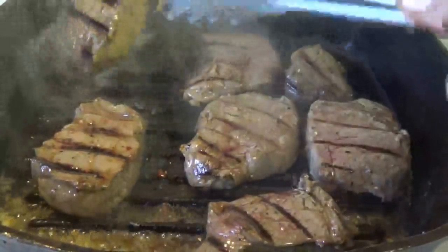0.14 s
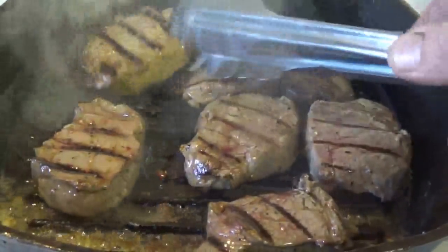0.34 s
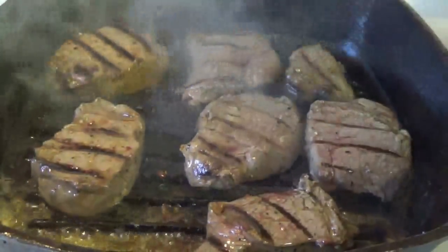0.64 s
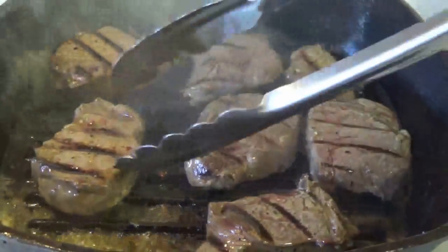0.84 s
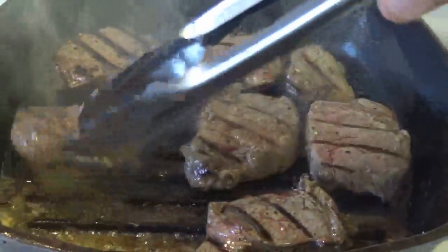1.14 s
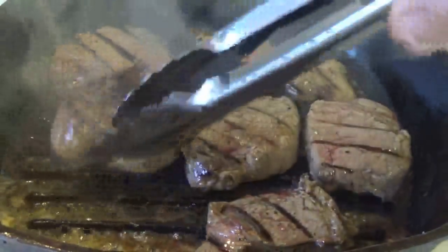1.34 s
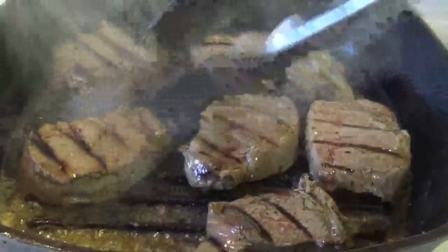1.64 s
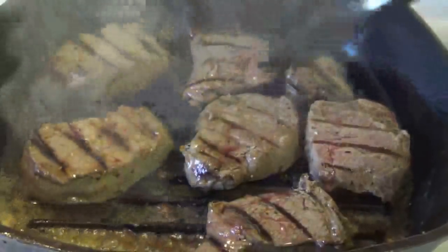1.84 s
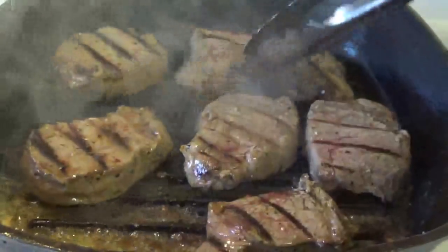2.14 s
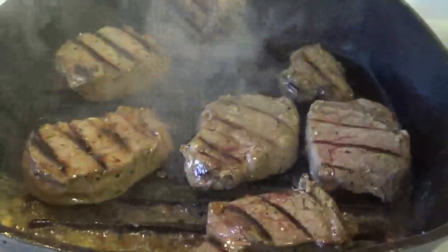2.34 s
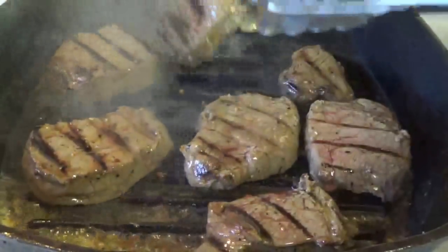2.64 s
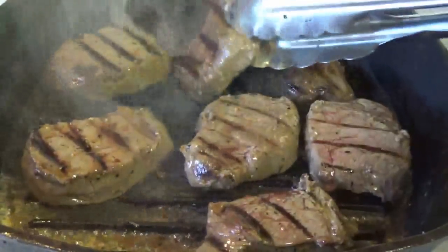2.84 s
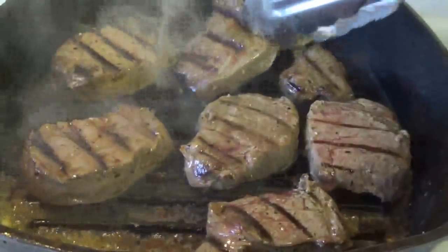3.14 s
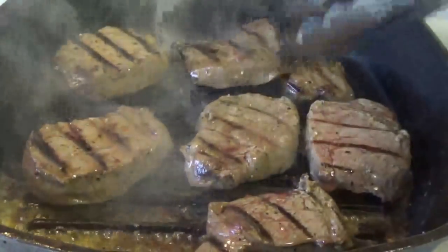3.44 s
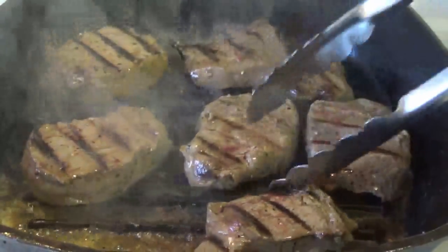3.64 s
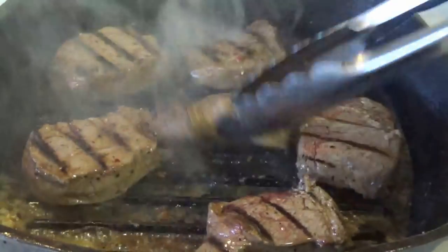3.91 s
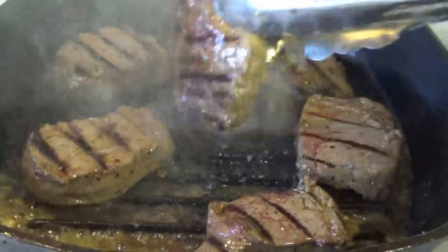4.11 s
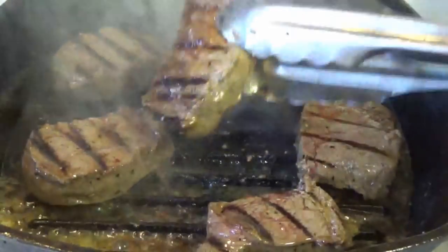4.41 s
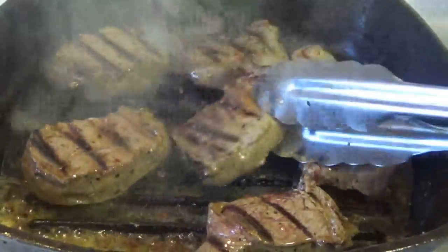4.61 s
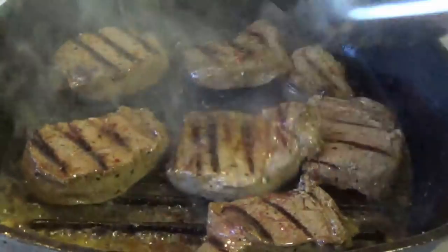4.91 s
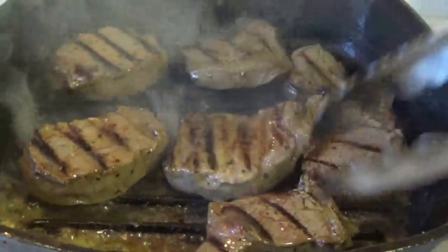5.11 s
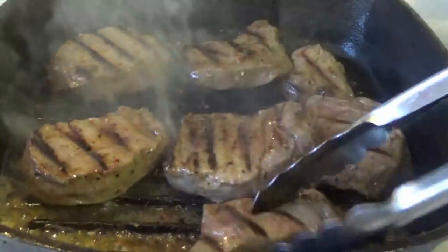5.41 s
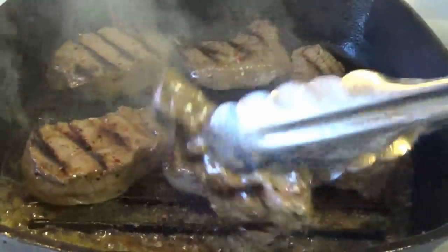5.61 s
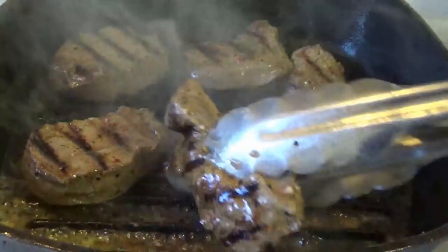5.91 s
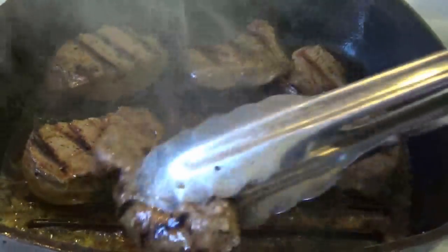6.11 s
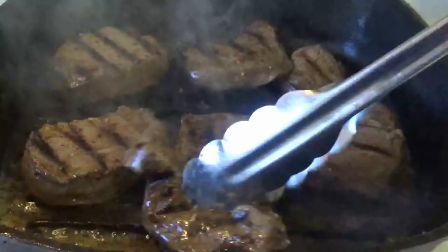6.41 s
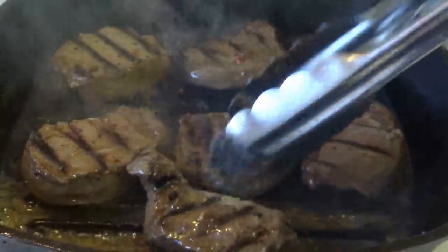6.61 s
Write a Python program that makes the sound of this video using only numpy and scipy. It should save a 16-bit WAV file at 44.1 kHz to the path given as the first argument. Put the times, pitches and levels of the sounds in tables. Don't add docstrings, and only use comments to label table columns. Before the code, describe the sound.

A loud, crisp frying hiss runs from start to finish with no pause, wavering slightly as meat pieces are lifted and turned. Crackles and snappy fat pops come irregularly, first in a quick cluster, then scattered. Wet steam squeals under newly laid meat early and late, and a few rounder plops sit below the pops. Close microphone over the stove, moderately wide, dry, with dulled extreme treble.

```python
import sys
import numpy as np
from scipy import signal
from scipy.fft import rfft, irfft, next_fast_len
from scipy.io import wavfile
from scipy.ndimage import uniform_filter1d

SR = 44100
rng = np.random.default_rng(int(sys.argv[2]) if len(sys.argv) > 2 else 0)


def generate_wav(sig):
    pcm = np.round(np.clip(np.atleast_2d(sig).T, -1, 1) * 32767).astype(np.int16)
    wavfile.write(sys.argv[1], SR, pcm)


def ratio_of_db(decibels):
    return 10 ** (np.asarray(decibels, float) / 20)


N = 297675
SLOW_S = np.arange(0, N / SR + .01, 1 / 400)

# time in seconds, strength in dB, coarseness (large bubbles against small) in dB.
BOIL = [(0, -17.5, -9.5), (.3, -20, -7.5), (.7, -19, -8), (1.1, -17.5, -7.5), (1.45, -19, -9.5),
        (1.8, -18.5, -10.5), (2.2, -19, -10.5), (2.55, -17.5, -10.5), (2.9, -18, -9.5), (3.3, -17.5, -10),
        (3.7, -16.5, -10.5), (4.2, -17.5, -9), (4.55, -17.8, -11), (4.87, -16.5, -9), (5.2, -17.5, -10),
        (5.7, -17.5, -8.5), (6.2, -18.5, -8.5), (6.75, -18.5, -7.5)]
SIZE_HZ = [5300, 8800, 2800, 1000]
FOLLOW_STRENGTH = [1, 0.66, 0.6, 0.32]
FOLLOW_COARSE = [-0.12, 0.13, 1.22, 0.2]
# frequency in Hz, level in dB per Hz.
FRY_COLOUR = [(15, -66), (25, -35), (77, -42.5), (353, -34.5), (840, -23.5), (1200, -21), (1430, -13.5),
              (1630, -17), (1760, -13), (2330, -9.5), (2640, -5.5), (4510, 0.5), (9680, 0.16), (11000, -3),
              (14300, -68), (22000, -120)]
# frequency in Hz, side against mid in dB.
SIDE_COLOUR = [(30, -21), (60, -12), (130, -12), (300, -17), (620, -15), (1120, -12), (2000, -9.5),
               (3600, -12), (6400, -14.5), (11600, -15.5)]
# time in seconds, length in seconds, bubble pitch in Hz,
# change in dB.
FLARES = [(.375, 0.22, 890, 6.5), (1.515, 0.2, 1500, 6), (3.37, 0.069, 1300, 4), (3.4, .2, 860, 0),
          (5, .15, 1130, 6.5), (5.75, 0.1, 1200, 2), (6.47, 0.16, 1300, 5), (2.1, 0.14, 1500, -1),
          (1.62, 0.34, 11000, 1.5), (3.5, 0.14, 11000, 3.5), (4.18, 0.18, 11000, 3), (0.68, 0.14, 10000, 1),
          (0.88, 0.17, 7400, -2), (3.87, 0.15, 12000, -2), (6.3, 0.27, 8800, -1), (2.46, 0.17, 5300, 1),
          (2.96, .7, 2300, -1), (4.7, .3, 7000, 0), (.75, 0.28, 6800, 1.3), (4.1, 0.32, 4000, 0.5),
          (1.15, 0.88, 3600, -2), (4.25, 0.2, 4500, 1), (3.5, .3, 6800, -1.5), (4.2, .4, 5700, -2),
          (2.4, 0.27, 14000, 1.5), (0.4, 0.43, 13000, 2), (6.25, 0.12, 6100, -1), (4.5, 0.1, 5300, -2.5),
          (2.7, .12, 6600, 0.5)]
# time in seconds, length in seconds, change in dB.
LOW_SWELLS = [(.1, .1, -3), (.73, 0.092, -2), (0.224, .08, 4.5), (0.333, 0.089, -9), (.55, 0.062, 5),
              (1.14, .07, -12), (1.58, 0.077, -2), (2.08, .18, 3.5), (2.4, .25, 1.5), (2.623, .14, 0),
              (2.8, 0.27, -5), (3.25, 0.17, 0.5), (3.697, .06, -6), (3.787, 0.079, -15), (3.873, 0.072, 2.5),
              (4.01, 0.072, 7), (4.096, 0.056, -7), (4.63, 0.12, 2.5), (4.89, 0.035, 3), (5.028, .08, -12),
              (5.323, .15, -6.5), (5.508, 0.1, 5.5), (5.762, 0.07, -8), (5.898, 0.04, -6), (6.285, 0.066, 3),
              (6.426, 0.048, -7)]
# start in seconds, length in seconds, first pitch
# in Hz, last pitch in Hz, level in dB.
JETS = [(1.425, 0.094, 6000, 6500, -22.5), (1.62, 0.17, 4750, 5000, -27), (1.77, 0.67, 5260, 4530, -23),
        (1.6, .6, 4340, 4100, -28), (6.15, .08, 3400, 4200, -24), (6.19, 0.16, 4200, 4600, -24.5),
        (6.39, 0.21, 4640, 5050, -24), (6.155, 0.113, 2850, 3140, -26), (5.5, 0.17, 2650, 2750, -41),
        (4.5, 0.1, 7160, 7200, -30), (5.86, 0.092, 6000, 5880, -26.5), (.3, .45, 6400, 6400, -27),
        (3.05, 0.27, 5000, 5400, -28), (4.3, .4, 4650, 4300, -29), (4.85, .2, 4130, 4200, -27.5)]
# time in seconds, peak in dB, pitch in Hz, ringing in cycles.
SPITS = [(0.501, -5, 2850, 7.3), (0.5363, -10, 3390, 5), (0.5631, -3, 3250, 5.3), (0.626, -9, 3950, 6),
         (0.7332, -8, 3150, 3.2), (0.9537, -11, 3030, 6), (1.174, -11, 3350, 7.7), (2.017, -9, 3680, 6),
         (2.0363, -5, 4100, 5.4), (2.163, -11, 3530, 8.9), (2.3111, -12, 3900, 6), (2.7263, -11, 3710, 6),
         (3.1747, -10, 3360, 5), (3.4974, -9.5, 3190, 6.8), (3.5992, -8, 3700, 6.7),
         (3.7808, -11.5, 3720, 7.7), (3.9923, -14, 3630, 6.8), (4.1744, -12, 3180, 7.2),
         (4.681, -17, 4200, 6), (4.7987, -6, 2880, 5.2), (4.8678, -11, 3100, 6.6), (4.9152, -10, 4130, 6.5),
         (5.199, -10, 3200, 8), (5.3797, -8, 3530, 6.5), (5.4096, -12, 3500, 6), (5.981, -9, 3740, 6),
         (6.1619, -11, 3420, 8.2), (6.3904, -10, 3040, 5.1), (6.638, -15, 3390, 6.6),
         (6.6617, -6, 3180, 6.6)]
# time in seconds, peak in dB, pitch in Hz, ringing in cycles.
PLOPS = [
    (0.719, -25, 2280, 3.7),
    (1.449, -23.5, 1830, 3.9),
    (3.369, -18.5, 2480, 3.2),
    (3.819, -18.5, 2390, 6.5),
    (4.199, -34, 1550, 4.5),
    (5.429, -24.5, 2520, 4.5),
    (6.019, -16.5, 2180, 3.9),
    (6.396, -11, 2580, 3.8),
    (6.484, -17, 2430, 4.5),
]
# delay in seconds, level in dB.
ECHOES = [(0.00344, -22.5), (0.0009, -35), (.0071, -18.5)]


def evened(x):
    return x / np.sqrt(np.mean(x ** 2) + 1e-20)


def read(points, hz):
    f, value = np.transpose(points)
    return np.interp(np.log(hz + 1), np.log(f + 1), value)


def coloured(x, points):
    size = next_fast_len(N)
    gain = ratio_of_db(read(points, np.fft.rfftfreq(size, 1 / SR)))
    return irfft(rfft(x, size) * gain, size)[..., :N]


def drift(per_s):
    hz = np.fft.rfftfreq(len(SLOW_S), SLOW_S[1])
    spectrum = rfft(rng.standard_normal(len(SLOW_S))) / (1 + (hz / per_s) ** 2)
    return evened(irfft(spectrum, len(SLOW_S)))


def bump(at_s, length_s):
    return np.exp(-4 * ((SLOW_S - at_s) / length_s) ** 2)


def bubble(hz, cycles, glide=0.061, snap=10.6):
    u = np.arange(int(3 * cycles / hz * SR) + 8) / SR * hz / cycles
    envelope = (1 - np.exp(-snap * u)) * np.exp(-3.0 * u)
    ring = envelope * np.sin(2 * np.pi * cycles * u * (1 + glide * u))
    return ring / abs(ring).max()


def fry(per_s=420, spread_db=3.0, cycles=3.93, gust_db=0.76, patch_db=1.3, mist_db=-0.5, heave_db=1.4, count=30):
    boil_s, level_db, coarse_db = np.transpose(BOIL)
    share_db = np.outer(FOLLOW_STRENGTH, level_db - level_db.mean())
    share_db = share_db + np.outer(FOLLOW_COARSE, coarse_db - coarse_db.mean())
    order = np.argsort(SIZE_HZ)
    log_sizes = np.log(SIZE_HZ)[order]
    t = np.arange(N) / SR
    gust = gust_db * drift(30.0)
    heave = sum(db * bump(at_s, length_s) for at_s, length_s, db in LOW_SWELLS)
    heave = heave - heave.mean() + heave_db * drift(3.6)
    mist = ratio_of_db(mist_db) * rng.standard_normal((2, N))
    out = np.zeros((2, N))
    for hz in np.geomspace(30, 12000, count):
        blend = np.array([np.interp(np.log(hz), log_sizes, order == k) for k in range(len(SIZE_HZ))])
        strength_db = np.interp(SLOW_S, boil_s, blend @ share_db) + gust + patch_db * drift(10.0)
        strength_db += 1.42 * heave / (1 + (hz / 600) ** 2)
        for at_s, length_s, flare_hz, db in FLARES:
            octaves = np.log2(hz / flare_hz)
            strength_db += db * bump(at_s, length_s) * np.exp(-(octaves / 0.7) ** 2)

        bursts_n = int(per_s * (hz / 5000) ** .6 * N / SR)
        when, chance, place = rng.random((3, 12000))[:, :bursts_n]
        size = ratio_of_db(spread_db * np.minimum(-np.log(chance), 4))
        bursts = np.zeros((2, N))
        bursts[:, (when * N).astype(int)] = size * np.array([place ** 0, np.sqrt(12) * (place - .5)])
        drive = bursts / np.std(bursts[0]) + np.roll(mist, rng.integers(N), axis=1)
        drive = drive * np.interp(t, SLOW_S, ratio_of_db(strength_db))

        shape = bubble(hz, cycles * rng.uniform(1.0, 1.005))
        shape *= np.sqrt(hz) / np.linalg.norm(shape)
        out += signal.oaconvolve(drive, shape[None], axes=1)[:, :N]
    mid, side = coloured(out, FRY_COLOUR)
    level = ratio_of_db(-17) / np.std(mid)
    return level * np.array([mid, coloured(side, SIDE_COLOUR)])


def jet(start_s, length_s, first_hz, last_hz, level_db, width_hz=700, flutter_db=1.8, waver=0.02):
    t = np.arange(start_s, start_s + length_s, 1 / SR)
    u = (t - start_s) / length_s
    hz = first_hz + (last_hz - first_hz) * u
    swell_db = level_db + np.interp(u, [0, 0.29, 1], [-0.5, 0, -4.5])
    hz = hz * (1 + waver * np.interp(t, SLOW_S, drift(25.0)))
    turn = np.exp(2j * np.pi * np.cumsum(hz) / SR)
    r = np.exp(-np.pi * width_hz / SR)
    flutter = ratio_of_db(flutter_db * np.interp(t, SLOW_S, drift(40.0)))
    steam = rng.standard_normal(SR)[:len(t)] * flutter / turn
    steam = (turn * signal.lfilter([1], [1, -2 * r, r * r], steam)).real
    out = np.zeros(N + SR)
    out[round(start_s * SR):][:len(t)] = evened(steam) * ratio_of_db(swell_db) * signal.windows.tukey(len(t), .12)
    return out[:N]


def spits(rows, trim_db, late_s=.0006, rim_s=0.00214, rim_db=-5.5):
    out = np.zeros(N + SR)
    for at_s, peak_db, hz, cycles in rows:
        burst = ratio_of_db(peak_db + trim_db) * bubble(hz, max(cycles, 1))
        out[round((at_s + late_s) * SR):][:len(burst)] += burst
    rim = ratio_of_db(rim_db) * np.roll(out, round(rim_s * SR))
    return out[:N] + rim[:N]


def hob(x, dull_hz=1800):
    taps = np.zeros(SR // 50)
    for delay_s, db in ECHOES:
        taps[round(delay_s * SR)] += ratio_of_db(db)
    taps = signal.lfilter(*signal.butter(2, dull_hz, fs=SR), taps)
    return x + signal.oaconvolve(x, taps[None], axes=1)[:, :N]


def scene():
    mid, side = fry()
    near = sum(jet(*row) for row in JETS)
    near = near + spits(SPITS, trim_db=-0.5) + spits(PLOPS, trim_db=2.5)
    bass_cut = signal.butter(4, 900, "high", fs=SR, output="sos")
    near = signal.sosfilt(bass_cut, near)
    return hob(np.array([mid + near + side, mid + near - side]))


def top_cut(x):
    return signal.sosfilt(signal.butter(12, 12160, fs=SR, output="sos"), x)


def record(dry):
    power_db = 10 * np.log10(abs(uniform_filter1d((dry ** 2).mean(0), 60)) + 1e-12)
    fall_db = np.arange(N) * 490.0 / SR
    held_db = np.maximum.accumulate(power_db + fall_db) - fall_db
    over_db = np.maximum(held_db + 15.5, 0)
    held = np.tanh(dry / ratio_of_db(.5 * uniform_filter1d(over_db, 30)))
    edge = signal.firwin(2047, 11025, window=("kaiser", 12), fs=SR)
    return top_cut(signal.oaconvolve(held, edge[None], "same"))


dry = scene()
out = record(dry)
generate_wav(out)
```